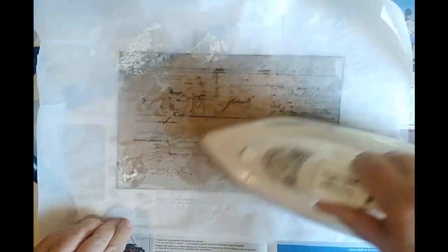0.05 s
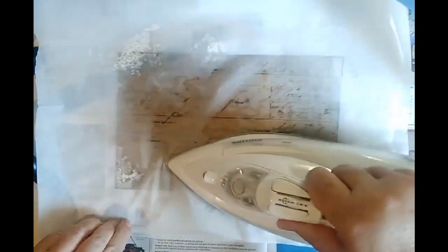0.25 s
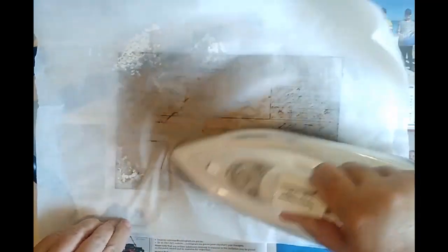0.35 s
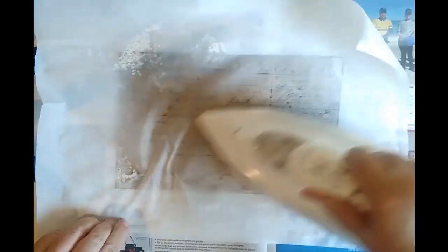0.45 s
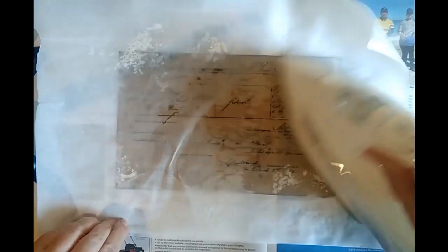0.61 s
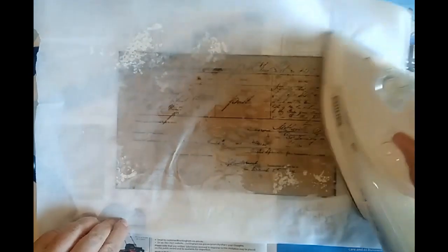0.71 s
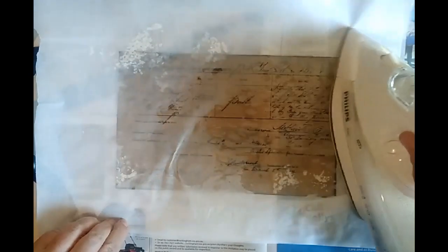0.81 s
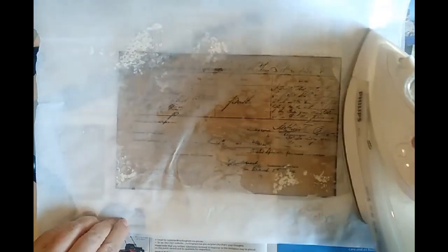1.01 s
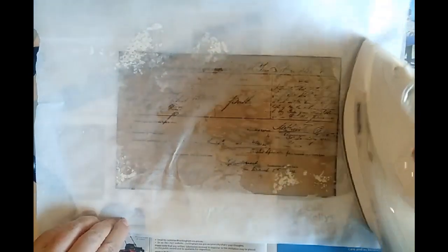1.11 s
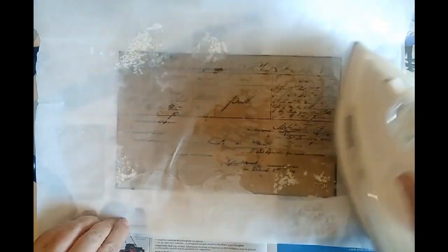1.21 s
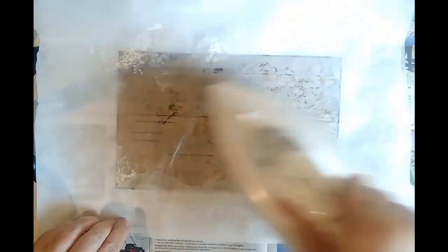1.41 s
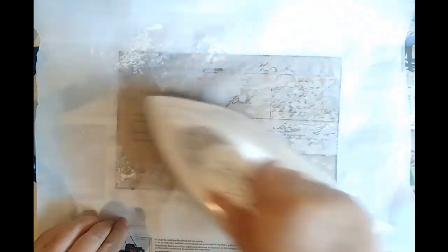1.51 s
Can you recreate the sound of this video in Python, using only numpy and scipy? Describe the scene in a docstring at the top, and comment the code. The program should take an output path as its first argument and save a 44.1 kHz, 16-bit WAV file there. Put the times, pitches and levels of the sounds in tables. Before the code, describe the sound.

Close up in a quiet room, baking paper rustles and crinkles under a sliding clothes iron, snapping hardest around the middle, then dies away over faint low rumble before a soft final thud; small noise-suppressed microphone.

```python
"""Quiet room: a clothes iron slides over baking paper, close to a small camera microphone.
Dense random slip grains over smooth noise make the hiss; creases crackle in short noise bursts;
single folds snap as one or two cycles of a sine; the iron bumps down at the end as decaying modes.
Room noise with a wavering rumble lies below. The recorder's noise suppressor turns down every band
in which the paper does not rise above the room noise."""
import sys
import numpy as np
from scipy import signal
from scipy.fft import rfft, irfft
from scipy.io import wavfile
from scipy.ndimage import uniform_filter1d

SR = 44100
rng = np.random.default_rng(int(sys.argv[2]) if len(sys.argv) > 2 else 0)


def store_pcm(level_fs):
    """Save levels as 16-bit WAV."""
    pcm = np.round(np.clip(level_fs, -1, 1) * 32767).astype(np.int16)
    wavfile.write(sys.argv[1], SR, np.atleast_2d(pcm).T)


def gain_from_db(level_db):
    """Turn a decibel level (scalar or array-like) into a linear amplitude factor."""
    decades = np.asarray(level_db, float) / 20
    return 10 ** decades


N = 68355  # samples

# slide of the iron: (time [s], level [dB], treble lift [dB])
SLIDE_PATH = [(0, -52, 3), (.12, -48.5, 3.5), (0.203, -45, 2), (0.234, -37, -1), (.295, -35, -5),
              (.315, -31.5, 0), (.37, -27.5, -4), (.392, -34.5, -4), (.415, -26.5, -4), (.43, -32, 0.5),
              (.49, -30, -2), (.54, -26.5, -4), (0.592, -27.5, -5), (.655, -34.5, -3), (.69, -31.5, -0.5),
              (0.771, -31.5, -1.5), (0.836, -37.5, -2.5), (0.868, -38, -3.5), (0.949, -44.5, 0),
              (1.05, -51.5, 0.5), (1.13, -55.5, -0.5), (1.22, -56.5, -1), (1.31, -64.5, 0),
              (1.37, -53, 2.5), (1.43, -50, 5.5), (1.51, -52.5, 3), (1.535, -55, 12), (1.55, -42, -1.5)]
# starts of the crackle bursts of creases under the sole: (time [s])
CREASE_START_S = [.2265, .240, .2725, .3007, .342, .382, .3975, .449, .4738, .497, .508, .5185, .527, .535,
                  .556, .6615, .675, .697, .717, .757, .843, .893, .989, 1.408, 1.5225, 1.530]
# the same bursts: (relative level [dB], centre [Hz], length [s])
CREASE_BURSTS = [(-24, 5000, 0.015), (-18, 1950, 0.0091), (-18, 4700, .003), (-16, 1800, 0.0079),
                 (-17.5, 1800, 0.013), (-15, 5400, 0.0041), (-6, 5400, .01), (-19.5, 2700, .006),
                 (-12, 3300, .004), (-12.5, 2500, .009), (-8, 3130, 0.0041), (-10.5, 2660, 0.0059),
                 (-9, 4200, 0.001), (-12.5, 4400, .003), (-9.5, 4100, .003), (-13, 3000, .012),
                 (-12.5, 2400, 0.0036), (-26, 4000, .005), (-15.5, 1900, 0.016), (-19.5, 1400, 0.0045),
                 (-18.5, 6300, 0.0043), (-25, 810, .012), (-33.5, 780, 0.011), (-35.5, 6000, 0.0042),
                 (-24.5, 6900, 0.0044), (-27.5, 4800, 0.0041)]
# creases are crisper than the rub: (frequency [Hz], gain [dB])
CREASE_TREBLE = [(6000, 0), (7500, 0), (15000, 3)]
# single folds that snap: (time [s], level [dB], frequency [Hz])
FOLD_SNAPS = [(.0723, -41, 4340), (.2573, -22, 3640), (.3018, -19, 2600), (.312, -20, 3570),
              (.3835, -16, 3610), (.4054, -11, 3050), (.511, -11, 3310), (.5404, -3, 4600),
              (.5474, -5, 4600), (.5496, -14, 3990), (.5639, -8, 3500), (.667, -16, 2100),
              (.6785, -15, 3200), (.760, -20, 2860), (1.5424, -35, 3670)]
# colour of paper and microphone: (frequency [Hz], gain [dB])
PAPER_COLOUR = [(300, -28.5), (600, -9.5), (750, -8), (990, -5.5), (1270, -1.5), (1590, -2.5), (2300, -3.5),
                (3430, 0), (4600, -2.5), (5700, -4.5), (6400, -14), (7290, -23.5), (8370, -18.5),
                (9500, -25.5), (11200, -16), (12700, -14.5), (15700, -27.5)]
# modes of the iron set down: (frequency [Hz], level [dB], t60 [s])
BUMP_MODES = [(45.3, -42.5, 0.19), (87.6, -46.5, 0.19), (1377, -45.5, 0.11), (1995, -52, 0.087)]
# colour of room and microphone noise: (frequency [Hz], gain [dB])
ROOM_COLOUR = [(12, -43.5), (30, -13.5), (53, -3.5), (107, -11.5), (200, -9), (400, -8.5), (751, -10),
               (1200, -16.5), (1830, -19.5), (2700, -22.5), (3500, -25.5), (5700, -30.5), (7600, -41.5),
               (9500, -40), (12000, -32), (15700, -36.5)]
# dips and swells of the low rumble: (time [s], level [dB])
RUMBLE_PATH = [(0.0, -64), (0.246, -70.5), (0.94, -66), (1.106, -72), (1.152, -67), (1.194, -67.5),
               (1.5, -63.5)]
# deepest cut of the suppressor: (frequency [Hz], gain [dB])
CUT_LIMIT = [(100, -14), (500, -24), (1100, -22.5), (2000, -18), (3000, -19), (4500, -10.5), (7500, -8.5),
             (15000, -12.5)]

ROOM_DB = -44.5


def on_log(f_hz, table):
    """Gain at f_hz of (frequency [Hz], gain [dB]) points, linear in dB over log frequency."""
    hz, db = np.array(table, float).T
    return gain_from_db(np.interp(np.log(np.maximum(f_hz, 1)), np.log(hz), db))


def colour(x, table):
    """Shape a spectrum by (frequency [Hz], gain [dB]) points."""
    gain = on_log(np.fft.rfftfreq(len(x), 1 / SR), table)
    return irfft(rfft(x) * gain, len(x))


def unit(x):
    """Scale to rms 1."""
    return x / np.sqrt(np.mean(x ** 2))


def band(x, hz, q):
    """Resonant band around hz."""
    return signal.lfilter(*signal.iirpeak(hz, q, SR), x)


def walk(rate_hz):
    """Random levels held 1 / rate_hz seconds and slewed twice."""
    hold = int(SR / rate_hz)
    held = np.repeat(rng.standard_normal(N // hold + 1), hold)
    slewed = uniform_filter1d(uniform_filter1d(held, hold), hold)
    return 1.1 * slewed[:N]


def grains(rate_hz, spread_db):
    """Random slips as clicks of either sign; their dB size is exponential with a cap, so very uneven."""
    chance, sign, size = rng.random((3, N))
    size_db = spread_db * np.minimum(-np.log(1 - size), 3.6)
    return unit((chance < rate_hz / SR) * np.sign(sign - 0.5) * gain_from_db(size_db))


def slide(t):
    """Slip grains over smooth rubbing; each band flickers on its own, the top one follows the lift."""
    smooth_db, flicker_db, patch_db = -3.5, 0.5, 0.58
    time_s, level_db, lift_db = np.array(SLIDE_PATH, float).T
    rub = grains(5000, 2.5) + gain_from_db(smooth_db) * rng.standard_normal(N)
    spectrum = rfft(unit(colour(rub, PAPER_COLOUR)))
    f_hz = np.fft.rfftfreq(N, 1 / SR)
    edges_hz = [0, 1200, 2200, 3600, 6800, SR]
    out = np.zeros(N)
    for lo, hi in zip(edges_hz, edges_hz[1:]):
        part = irfft(spectrum * ((f_hz >= lo) & (f_hz < hi)), N)
        part = part * gain_from_db(flicker_db * walk(40))
        if hi == SR:
            part = part * gain_from_db(np.interp(t, time_s, lift_db))
        out += part
    return out * gain_from_db(np.interp(t, time_s, level_db) + patch_db * walk(90))


def bursts(t):
    """Each crease: quick rise, hold, fall of dense crackle, tinted round its own centre."""
    rise_s, fall_s = 0.0006, 0.0025
    all_db, broad_db = -18, -0.56
    crackle = grains(9000, 4.4) + 0.98 * rng.standard_normal(N)
    crackle = unit(colour(crackle, PAPER_COLOUR))
    broad = gain_from_db(broad_db) * colour(crackle, CREASE_TREBLE)
    out = np.zeros(N)
    for start_s, (db, hz, length_s) in zip(CREASE_START_S, CREASE_BURSTS):
        u = t - start_s
        rise = np.clip(u / rise_s, 0, 1)
        fall = np.exp(-np.maximum(u - length_s, 0) / fall_s)
        tinted = unit(band(crackle, hz, 0.64))
        out += gain_from_db(db + all_db) * rise * fall * (tinted + broad)
    return out


def snaps(t):
    """A fold flips over: one or two cycles of a sine under a Gaussian envelope."""
    width_cycles = 2.1  # between the 1/e points
    out = np.zeros(N)
    for time_s, db, hz in FOLD_SNAPS:
        cycles = (t - time_s) * hz
        out += gain_from_db(db) * np.exp(-(2 * cycles / width_cycles) ** 2) * np.sin(2 * np.pi * cycles)
    return out


def bump(t):
    """The sole meets the board: decaying modes give a thud and a short ring."""
    u = np.maximum(t - 1.522, 0)  # s since contact
    out = np.zeros(N)
    for hz, db, t60_s in BUMP_MODES:
        out += gain_from_db(db) * np.sin(2 * np.pi * hz * u) * np.exp(-np.log(1000) * u / t60_s)
    return out


def add_tail(x, t):
    """Table and walls return a short diffuse tail: decaying noise convolved with the paper."""
    t60_s, tail_db = 0.098, -7.5
    tail = rng.standard_normal(6000) * np.exp(-np.log(1000) * t[:6000] / t60_s)
    tail = tail / np.sqrt(np.sum(tail ** 2))
    return x + gain_from_db(tail_db) * signal.fftconvolve(x, tail)[:N]


def room_noise():
    """Steady coloured noise of room and microphone."""
    return unit(colour(rng.standard_normal(N), ROOM_COLOUR))


def room(t):
    """Steady hiss; the rumble below 110 Hz wavers about its mean level."""
    rumble_mean_db = -68
    noise = room_noise()
    rumble = signal.filtfilt(*signal.butter(2, 110, fs=SR), noise)
    time_s, level_db = np.array(RUMBLE_PATH, float).T
    waver = gain_from_db(np.interp(t, time_s, level_db) - rumble_mean_db)
    return gain_from_db(ROOM_DB) * (noise - rumble + rumble * waver)


def scene():
    """High-passed paper with its tail, the bump, and the room noise."""
    t = np.arange(N) / SR
    low_cut = signal.butter(4, 560, "high", fs=SR, output="sos")
    paper = signal.sosfilt(low_cut, slide(t) + bursts(t) + snaps(t))
    paper = add_tail(paper, t)
    return (paper + bump(t) + room(t))[None]


def suppress(x):
    """Subtract the expected room noise band by band, never deeper than CUT_LIMIT."""
    margin_db, hardness = 2.5, 1.49
    memory, blur_bins = 0.82, 1.1  # memory: share kept per frame
    f_hz, _, z = signal.stft(x, SR, nperseg=512, noverlap=384)
    noise = gain_from_db(ROOM_DB) * room_noise()
    expected = np.mean(abs(signal.stft(noise, SR, nperseg=512)[2]) ** 2, axis=1)[:, None]
    # power over expected noise, blurred across bins, then smoothed in time
    blur = np.exp(-(np.arange(-8, 9) / blur_bins) ** 2)[:, None]
    power = signal.fftconvolve(abs(z) ** 2 / expected, blur / blur.sum(), mode="same")
    start = memory * power[:, 4:5]
    power = signal.lfilter([1 - memory], [1, -memory], power, axis=1, zi=start)[0]
    share = np.clip(1 - gain_from_db(2 * margin_db) / np.maximum(power, 1e-9), 0, 1)
    gain = np.maximum(share ** hardness, on_log(f_hz, CUT_LIMIT)[:, None])
    return signal.istft(z * gain, SR, nperseg=512, noverlap=384)[1][:N]


def top_cut(x):
    """Nothing passes above the cut-off."""
    return signal.sosfilt(signal.butter(12, 15850, fs=SR, output="sos"), x)


def record(dry):
    """The recorder suppresses the noise and stores the finished mix."""
    mix = suppress(dry[0])[None]
    return top_cut(mix)


dry = scene()
out = record(dry)
store_pcm(out)
```